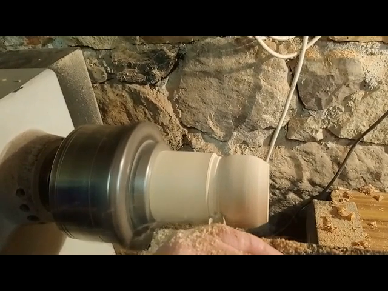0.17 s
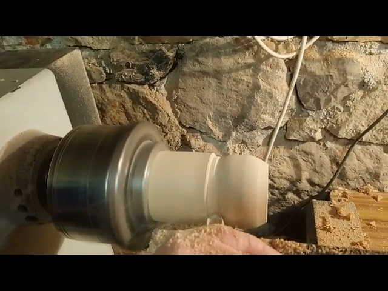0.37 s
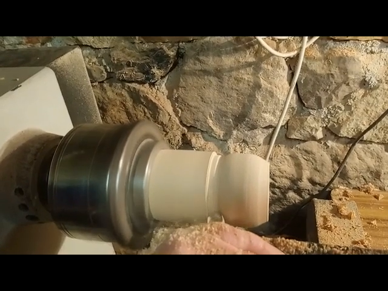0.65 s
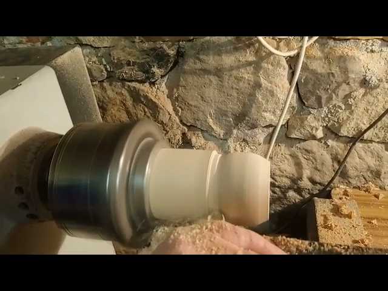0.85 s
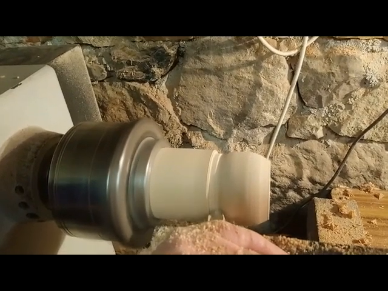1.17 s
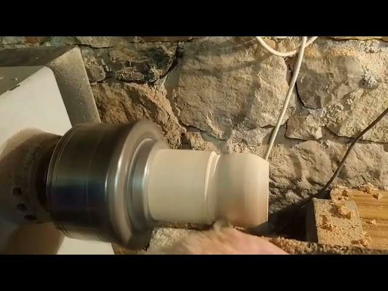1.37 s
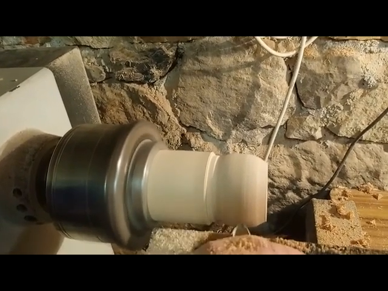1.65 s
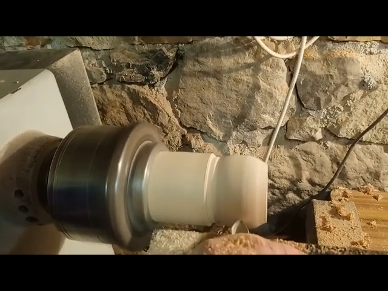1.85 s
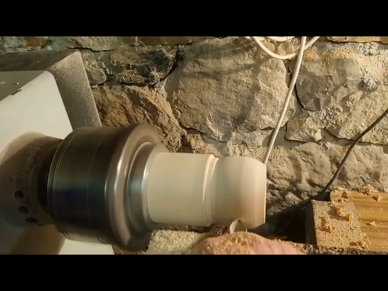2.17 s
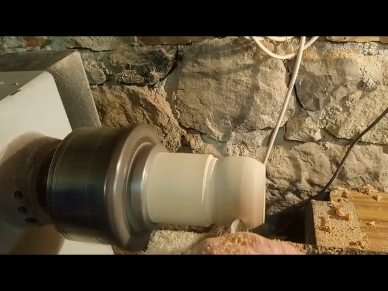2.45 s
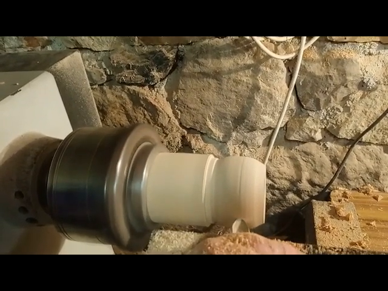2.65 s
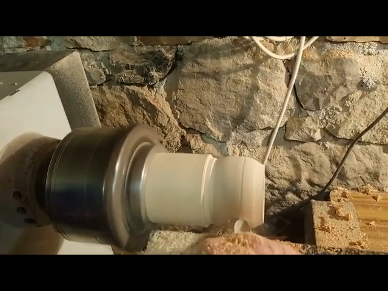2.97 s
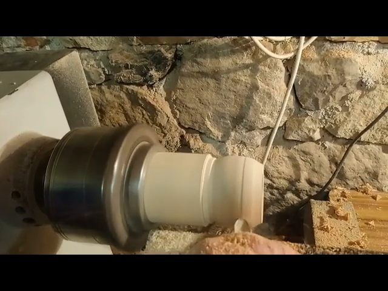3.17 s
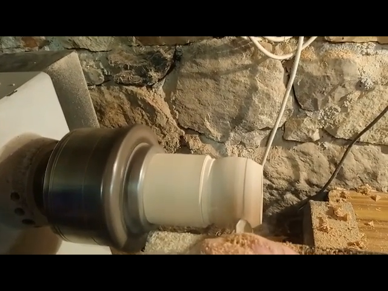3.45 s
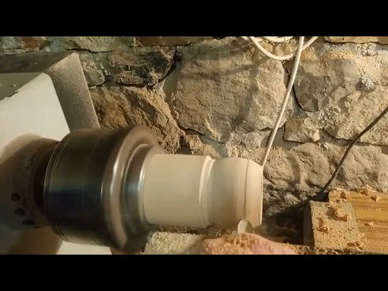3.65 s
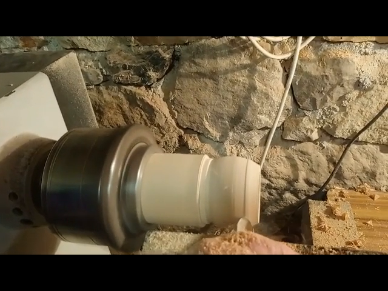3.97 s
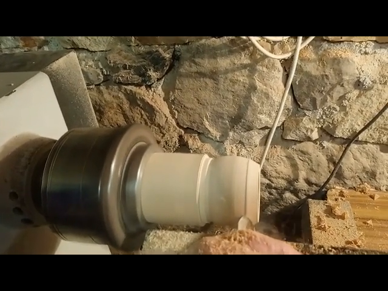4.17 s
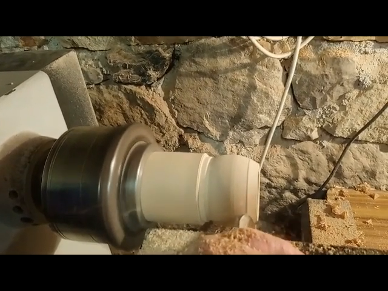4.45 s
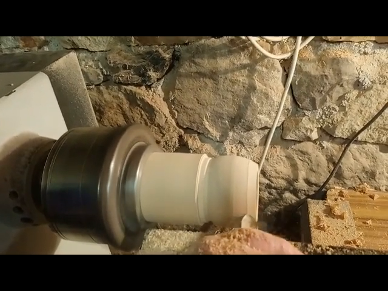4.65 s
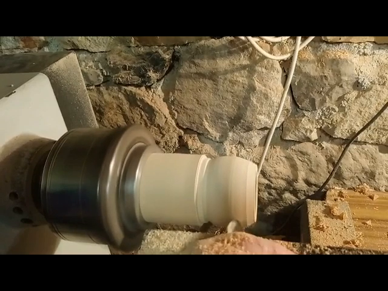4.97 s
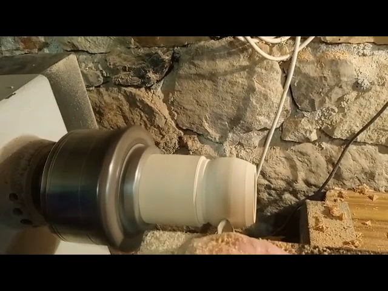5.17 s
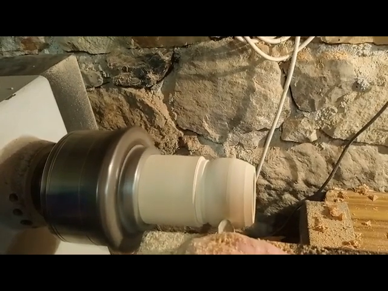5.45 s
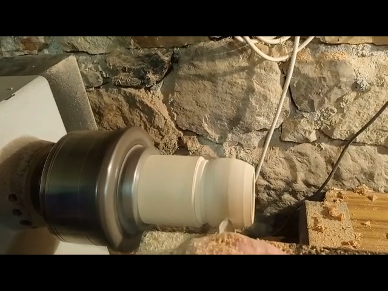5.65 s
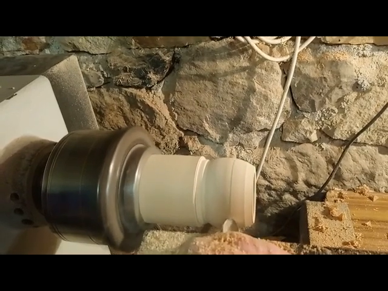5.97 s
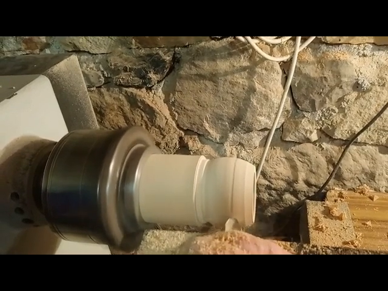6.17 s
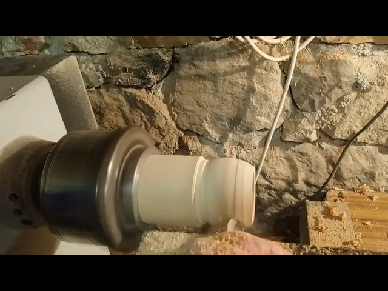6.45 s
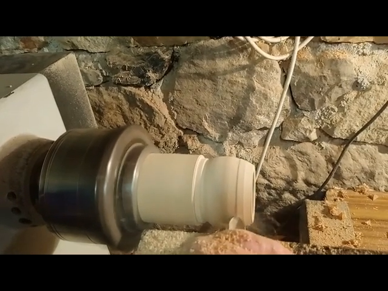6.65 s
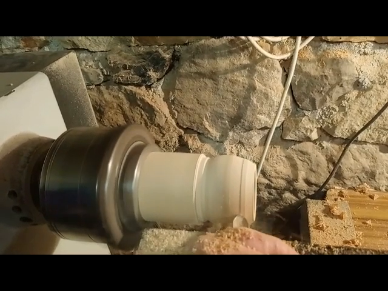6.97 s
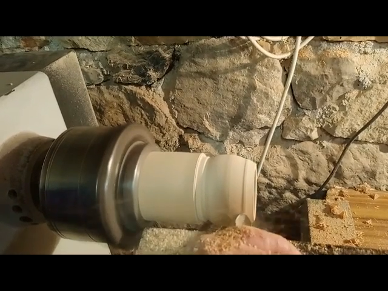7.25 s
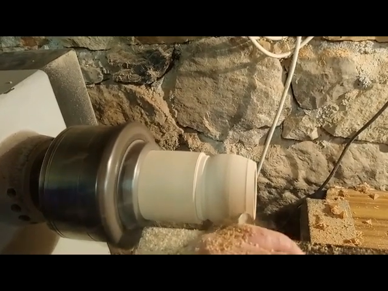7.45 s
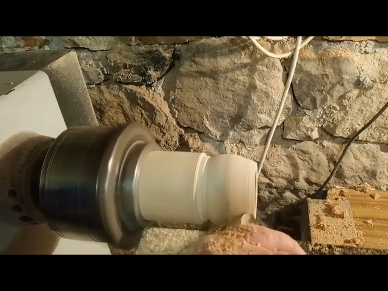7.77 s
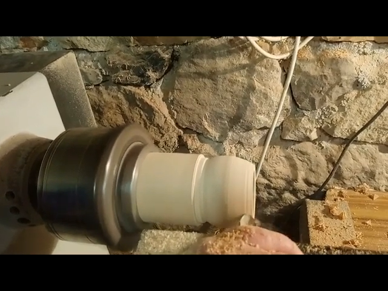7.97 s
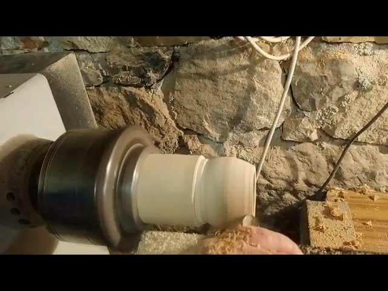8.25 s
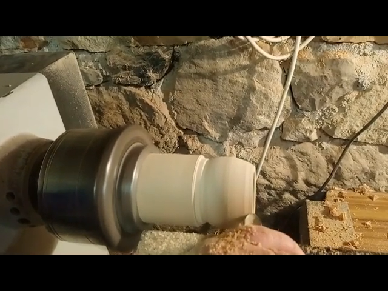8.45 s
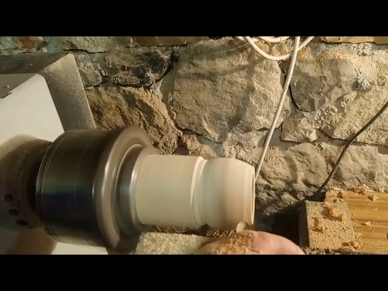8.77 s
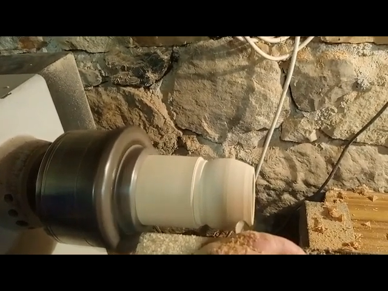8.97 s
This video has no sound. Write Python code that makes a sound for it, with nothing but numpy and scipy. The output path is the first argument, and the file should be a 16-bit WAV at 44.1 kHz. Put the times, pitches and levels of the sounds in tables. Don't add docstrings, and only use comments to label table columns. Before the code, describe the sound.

Motor, belt and bearings hum and rumble throughout, sinking under each cut as the recording level adjusts. A hand-held gouge tears the spinning wood with a gritty, ringing scrape, fluttering rapidly with each turn. It lifts after a second, returns for two passes of several seconds, and touches once more briefly. Short reflections from stone walls, close microphone.

```python
import sys
import numpy as np
from scipy import signal
from scipy.fft import rfft, irfft, next_fast_len
from scipy.io import wavfile
from scipy.ndimage import uniform_filter1d

SR = 44100
rng = np.random.default_rng(int(sys.argv[2]) if len(sys.argv) > 2 else 0)


def amplitude_ratio(level_db):
    exponent = np.asarray(level_db, float) / 20
    return 10 ** exponent


def wav_out(sig):
    wavfile.write(sys.argv[1], SR, np.round(np.clip(np.atleast_2d(sig).T, -1, 1) * 32767).astype(np.int16))


N = 401751
TURN = 2630
ROLL_S = 7.1

# (pitch [Hz], width [Hz], left level [dB], right level [dB])
FLAT_RING = [(260.5, 28, -7.5, -6.5), (457, 110, -15.5, -13), (700, 460, -22, -29),
             (1225, 350, -15.5, -15.5), (1423, 50, 1, -7.5), (1540, 80, -16, -14), (1680, 360, -16, -15),
             (2080, 340, -24, -9.5), (2325, 370, -3, -13), (2580, 380, -5, -30), (2800, 360, -13, -25),
             (3370, 510, -21, -13.5), (3750, 170, -2, -3.5), (3990, 390, -5, -9), (4470, 420, -6, -10),
             (4930, 280, -4.5, -5), (5250, 2900, -60, -18.5), (5270, 660, -8, -60), (6270, 250, -15, -17),
             (7300, 1400, -31, -25.5), (8540, 1700, -34, -32), (9960, 950, -60, -34),
             (11000, 260, -47, -33), (11840, 650, -41, -31), (12760, 940, -36, -32), (14700, 640, -37, -47)]
# (pitch [Hz], width [Hz], left level [dB], right level [dB])
ROLLED_RING = [(267.6, 23.0, -10.0, -10.5), (461.0, 71, -17.0, -14.5), (648, 30, -22.5, -22.0),
               (807, 330, -29.5, -42), (1101, 90, -17.5, -15), (1250, 72, -13.5, -17.5),
               (1410.0, 52, -3, -18), (1523, 330, -16.0, -15.5), (1748, 82, -19, -13),
               (1924, 47, -7, -11.5), (2170, 227, -5, -6.5), (2518, 480, -7.0, -25.0), (3304, 283, -8, -9),
               (3727, 355, -1.0, -3.5), (4116, 250, -3.0, -9), (4695, 590, -4.5, -50),
               (5140, 420, -16.5, -9.0), (5690, 750, -12.5, -10), (6560, 1200, -19.0, -13),
               (7220, 500, -25.5, -8.5), (8280, 290, -32.5, -25), (8920, 390, -30, -30),
               (9830, 860, -60, -29.5), (10700, 2000, -60, -43.0), (12140, 1240, -43, -33.5),
               (12870, 440, -45, -32.5), (13440, 350, -35, -42), (13650, 80, -44, -50),
               (14700, 1500, -36, -36), (3807, 320, 0.76, -1)]
# (pitch [Hz], width [Hz], left level [dB], right level [dB])
SWUNG_RING = [(260.6, 24, -6, -6), (474, 126, -17, -13.5), (652, 110, -19.5, -27), (880, 270, -32, -32),
              (1140, 150, -12.5, -15.5), (1273, 50, -27, -9), (1426, 63, 1, -21), (1500, 210, -12, -11.5),
              (1764, 74, -7, -18), (2015, 360, -6.5, -6), (2220, 170, 0, -7.5), (2447, 290, 0, -31),
              (2740, 320, -54, -12.5), (3180, 480, -6.5, -60), (3787, 340, 1.5, -0.5),
              (3570, 760, -60, -12), (4480, 990, -15.5, -36), (5410, 430, -15.5, -12.5),
              (5900, 820, -19.5, -21), (6760, 850, -29, -19), (7400, 430, -26, -19.5),
              (8070, 250, -35, -24.5), (8700, 730, -34, -30), (9860, 630, -46, -31), (10770, 290, -60, -36),
              (11900, 420, -43, -32.5), (12700, 440, -43, -33), (13300, 510, -38, -36),
              (14270, 280, -46, -45), (14740, 860, -38, -59)]
# (pitch [Hz], width [Hz], left level [dB], right level [dB])
LATHE_RUMBLE = [(93, 29, -15, -11.5), (163, 31, -15.5, -7.5), (266, 64, -3.5, -3.5),
                (351.6, 15, 0.5, -73.5), (425, 140, -21, -10.5), (509, 210, -6, -3), (588, 180, -13, -17),
                (740, 930, -19.5, -23.5), (1090, 540, -20, -14), (1420, 550, -8, -16.5),
                (1580, 87, -9, -10), (2140, 650, -11.5, -19.5), (2880, 1050, -17.5, -26.5),
                (3950, 1600, -21.5, -23.5), (4950, 4100, -51, -25.5), (6070, 1900, -60, -28),
                (7520, 300, -60, -41), (8950, 800, -60, -32)]
# (pitch [Hz], width [Hz], level [dB])
BELT_HUMS = [(88.6, 1, -50), (123.3, 8, -51), (169, 0.5, -52.5), (252.4, 6, -35.5), (327, 2, -63.5),
             (419.4, 10.5, -45.5), (495, 1, -43), (593.4, 2.5, -47), (800, 12, -58.5), (940, 14, -56.5),
             (1081, 10, -53), (1162, 3, -60), (1234, 11.5, -54)]
# (pitch [Hz], left level [dB], right level [dB])
DRIVE_WHINE = [(8516, -95, -80), (8750, -91, -58.5), (8500, -92, -68), (9108, -95, -74), (9400, -88, -71)]
# (pitch [Hz], likeness [0-1])
EAR_LIKENESS = [(60, 0.83), (300, 1), (600, 0.63), (1200, 0.89), (2500, 0.14), (4000, 0.29), (7500, 0.23),
                (9000, .3), (15000, .5)]
# (pitch [Hz], width [Hz], left depth [0-1], right depth [0-1])
PORT_LOSSES = [(7740, 340, 1, 0.58), (11660, 190, .1, 0.17), (14000, 200, .6, .6)]
# (pitch [Hz], level against the loudest band [dB])
FAINTEST = [(2500, -46), (6000, -46), (8000, -40), (10500, -38), (13000, -41), (15500, -38)]
# (edge touches [s], edge lifts [s], high side meets the edge [s],
#          first depth [out-of-rounds], full depth [out-of-rounds])
PASSES = [
    (-1.5, .972, .014, 0.0, 4.0),
    (1.912, 4.415, 2.031, -.2, 3.5),
    (4.936, 8.275, 5.012, -.03, 3.5),
    (9.078, 9.3, 9.1, 1.5, 3.5),
]
# (time [s], gouge ring [dB], lean on the rest [dB], flow of shavings [dB])
HAND_MOVES = [
    [(0, -26, 1, 0), (.27, -26, -.5, 1), (.42, -28, 3.5, 2), (.6, -26.5, 3, -.5), (.84, -27, 3.5, -1),
     (.89, -29, 5, -1.5), (.935, -34.5, 4, -7.5)],
    [(2.25, -23.5, -4, -8), (2.27, -20.5, -4.5, -10.5), (2.43, -20.5, -6, -13), (2.53, -22.5, -2.5, -4),
     (3.27, -22, -5, -5), (3.55, -20, -6.5, -9.5), (3.72, -21.5, -5.5, -5.5), (4.27, -22.5, -4.5, -9),
     (4.39, -31.5, 0, -17.5)],
    [(5.3, -23.5, -4, -7.5), (5.54, -24, -2, -4), (5.82, -22, -5.5, -6), (6.83, -21, -5.5, -7),
     (7.45, -25, 1, -8.5), (7.92, -22, -4, -9.5), (8.06, -26, -1.5, -14), (8.2, -25, -5.5, -13.5),
     (8.23, -29.5, -3, -10)],
]
# (time [s], gouge ring [dB], lean on the rest [dB], flow of shavings [dB])
SKIM_HAND = [
    (9.09, -31.5, -6, -7),
]
DUST_LEVELS = [
    -19.5,
    -16.5,
    -15.5,
    -14,
]
# (place after the high side [turns], extra level [dB])
HARD_SPOTS = [
    (.35, 2.5),
    (.61, 1.8),
]


def evened(x):
    return x / np.sqrt(np.mean(x ** 2) + 1e-20)


def smooth(x, s):
    size = max(int(s * SR), 1)
    return uniform_filter1d(uniform_filter1d(x, size), size)


def returning(memory):
    turns = len(memory) // TURN + 1
    marks = rng.standard_normal((turns, TURN))
    keep = np.clip(np.resize(memory, turns * TURN).reshape(turns, TURN), 0, .97)
    for k in range(1, turns):
        marks[k] = keep[k] * marks[k - 1] + np.sqrt(1 - keep[k] ** 2) * marks[k]
    return marks.ravel()[:len(memory)]


def walls(early_db, tail_db, t60):
    t = np.arange(8192) / SR
    echoes = rng.choice([-1., 1.], (2, 8192)) * (rng.random((2, 8192)) < 2000 / SR) * (t > .001)
    early = echoes * np.exp(-t / 0.0037)
    tail = echoes * amplitude_ratio(-60 * t / t60)
    out = amplitude_ratio(early_db) * early / np.linalg.norm(early[0])
    out += amplitude_ratio(tail_db) * tail / np.linalg.norm(tail[0])
    out = signal.lfilter(*signal.butter(N=2, Wn=700, btype="high", fs=SR), out)
    out[:, 0] += 1
    return out


def radiate(force, other, modes, room, lag, top_hz=17000):
    size = next_fast_len(len(force) + 16384)
    hz = np.fft.rfftfreq(size, 1 / SR)
    power = 0
    for f, width, l_db, r_db in modes:
        power = power + amplitude_ratio([[l_db], [r_db]]) ** 2 / (1 + (2 * (hz - f) / width) ** 2) ** 2
    power = power / (1 + (hz / top_hz) ** 12)
    fold = irfft(np.log(power + 1e-10) / 2, size)
    fold[:, 1:size // 2] *= 2
    fold[:, size // 2 + 1:] = 0
    like_hz, likeness = np.transpose(EAR_LIKENESS)
    same = np.clip(np.interp(np.log(hz + 1), np.log(like_hz), likeness), 0, 1)
    left = rfft(force, size)
    right = same * left * np.exp(2j * np.pi * hz * lag / SR)
    right += np.sqrt(1 - same ** 2) * rfft(other, size)
    heard = np.array([left, right]) * np.exp(rfft(fold)) * rfft(room, size)
    return irfft(heard, size)[:, :len(force)]


def edge_depth(t, touch, lift, first, full):
    sunk = 1 - np.exp(-(t - touch) / .43)
    depth = np.minimum(first + (full - first) * sunk, 1.6 + 6 * (lift - t))
    clear = -1.2
    landed = np.clip(np.minimum((t - touch) / .011, (lift - t) / .021), 0, 1)
    return sunk, clear + (depth - clear) * landed


def tear_fibres(t, touch, lift, high_spot, first, full, lean_db):
    sunk, depth = edge_depth(t, touch, lift, first, full)
    thin = np.exp(-abs(lift - t) / .35)
    memory = .72 + .04 * lean_db + .2 * thin
    turns = (t - high_spot) * SR / TURN
    high_side = np.cos(2 * np.pi * turns)
    bite = np.clip((depth + high_side) / .7, 0, 1) ** .8 * (t < lift)
    bite *= amplitude_ratio(3.2 * high_side / np.maximum(depth, 1) ** 1.2)
    fibres = evened(smooth(returning(memory + 0.11), 0.001))
    fibres += 0.48 * evened(smooth(returning(memory + 0.23), 0.011))
    fibres += 0.29 * evened(smooth(rng.standard_normal(len(t)), 0.0083))
    flicker_db = 1.5 + 1.3 * sunk + 2.2 * thin
    grain_db = sum(db * np.exp(-((turns % 1 - place) / .03) ** 2) for place, db in HARD_SPOTS)
    drive = bite * amplitude_ratio(flicker_db * fibres / 2.26 + sunk * (1 + 2 * thin) * grain_db)
    snaps = amplitude_ratio(1.8 * np.minimum(rng.exponential(1, len(t)), 3))
    low = signal.butter(N=2, Wn=2400, fs=SR)
    high = signal.butter(N=2, Wn=2400, btype="high", fs=SR)
    forces = []
    for ear in "LR":
        coarse = signal.lfilter(*low, returning(memory))
        fine = signal.lfilter(*high, evened(snaps * rng.standard_normal(len(t))))
        forces.append(drive * (coarse + fine))
    return bite, forces


def part_levels(now, touch, lift, high_spot, dust_base_db, hand):
    at, ring, lean, flow = np.transpose(hand)
    entry = np.exp(-(now - touch) / 0.1)
    ring_db = np.interp(now, at, ring) - 2.5 * entry
    ring_db += -330 * np.clip(now - at[-1], 0, .05) * (now > lift - .08)
    lean_db = np.interp(now, at, lean)
    flow_db = np.interp(now, at, flow) - 10 * entry
    flow_db += 4.5 * np.exp(-(now - touch) / 0.32) * np.cos(2 * np.pi * (now - high_spot) * SR / TURN)
    dust_db = dust_base_db + 0.36 * flow_db + 0.48 * lean_db
    wander = evened(uniform_filter1d(rng.standard_normal(len(now)), size=50))
    bench_db = -34.5 + 0.36 * lean_db + wander
    return [bench_db, ring_db + lean_db, ring_db, ring_db + flow_db, ring_db + dust_db]


def cut(touch, lift, high_spot, first, full, dust_base_db, hand, holds, room):
    t = np.arange(round(max(touch, 0) * SR), min(round((lift + 0.097) * SR), N)) / SR
    at, ring, lean, flow = np.transpose(hand)
    bite, forces = tear_fibres(t, touch, lift, high_spot, first, full, np.interp(t, at, lean))
    ringing = [radiate(*forces, hold, room, 8.2) for hold in holds]
    hz, frames, z = signal.stft(ringing, SR, nperseg=512, noverlap=384)
    now = frames + t[0]
    levels = part_levels(now, touch, lift, high_spot, dust_base_db, hand)
    edges = [0, 900, 3100, 4400, 7900, SR]
    for lo, hi, db in zip(edges, edges[1:], levels):
        part = (hz >= lo) & (hz < hi)
        power = np.mean(np.sum(abs(z[:, :, part].mean(1)) ** 2, 1), 1) * 4 / 3 / np.mean(bite ** 2)
        z[:, :, part] *= amplitude_ratio(db) / np.sqrt(power)[:, None, None, None]
    swung = np.clip((now - ROLL_S) / 0.12, 0, 1)
    z = (1 - swung) * z[0] + swung * z[-1]
    clumps = uniform_filter1d(rng.standard_normal(z.shape), size=7, axis=1)
    clumps = evened(uniform_filter1d(clumps, size=18, axis=2))
    z *= amplitude_ratio(clumps * (0.8 + 1.23 * (hz[:, None] / 12000) ** 2))
    grip = uniform_filter1d(rng.standard_normal(z.shape[1:]), size=3, axis=0)
    z *= amplitude_ratio(1.3 * evened(uniform_filter1d(grip, size=70, axis=1)))
    return round(t[0] * SR), signal.istft(z, SR, nperseg=512, noverlap=384)[1][:, :len(t)]


def resonate(x, hz, width):
    spin = np.exp(2j * np.pi * hz * np.arange(len(x)) / SR)
    r = np.exp(-np.pi * max(width, 4) / SR)
    return 2 * (spin * signal.lfilter([1 - r], [1, -r], x / spin)).real


def machine(room):
    t = np.arange(N) / SR
    throb = amplitude_ratio(0.58 * evened(smooth(rng.standard_normal(N), 0.057)))
    shaking = throb * rng.standard_normal((2, N))
    sound = amplitude_ratio(-32.5) * evened(radiate(*shaking, LATHE_RUMBLE, room, 16.5, top_hz=10100))
    for hz, width, db in BELT_HUMS:
        sound += amplitude_ratio(db) * evened(resonate(rng.standard_normal(N), hz, width))
    for hz, l_db, r_db in DRIVE_WHINE:
        sound += amplitude_ratio([[l_db], [r_db]]) * np.sqrt(2) * np.sin(2 * np.pi * (hz * t + rng.random()))
    return sound


def scene():
    room = walls(-10.5, -13, 0.34)
    tool = np.zeros((2, N))
    holds = [[FLAT_RING], [ROLLED_RING], [ROLLED_RING, SWUNG_RING], [ROLLED_RING]]
    for row, dust_db, hand, hold in zip(PASSES, DUST_LEVELS, list(HAND_MOVES) + [SKIM_HAND], holds):
        start, sound = cut(*row, dust_db, hand, hold, room)
        tool[:, start:start + sound.shape[1]] += sound
    loud_db = 10 * np.log10(abs(smooth((tool ** 2).mean(0), 0.0087)) + 1e-9)
    duck_db = smooth(np.maximum(loud_db + 26.5, 0), 0.039)
    return tool + machine(room) * amplitude_ratio(-.8 * duck_db)


def mute_faint(x, waver_db):
    window = np.sqrt(signal.windows.hann(2048, sym=False))
    hz, t, z = signal.stft(x, SR, window=window, nperseg=2048, noverlap=1024)
    bands = z[:, :1024].reshape(2, 128, 8, -1)
    band_db = 10 * np.log10((abs(bands) ** 2).mean(2) + 1e-14)
    under_db = np.interp(hz[4:1024:8], *np.transpose(FAINTEST), left=-99)[:, None]
    waver = evened(uniform_filter1d(rng.standard_normal(band_db.shape[1:]), size=2, axis=1))
    margin_db = band_db - band_db[:, 6:].max((0, 1)) - under_db + waver_db * waver
    z[:, :1024] = (bands * (margin_db > 0)[:, :, None]).reshape(2, 1024, -1)
    return signal.istft(z, SR, window=window, nperseg=2048, noverlap=1024)[1][:, :N]


def low_pass(x):
    return signal.sosfilt(signal.butter(12, 15680, fs=SR, output="sos"), x)


def record(dry):
    hz = np.fft.rfftfreq(N, 1 / SR)
    ports = 1
    for f, width, left, right in PORT_LOSSES:
        ports = ports * (1 - np.clip([[left], [right]], 0, 1) / (1 + (2 * (hz - f) / width) ** 2))
    hiss = amplitude_ratio([[-82], [-66]]) * rng.standard_normal((2, N))
    heard = irfft(rfft(dry + hiss) * ports / np.sqrt(1 + (80 / (hz + 1)) ** 9), N)
    flutter = signal.lfilter(*signal.butter(N=2, Wn=35, fs=SR), rng.standard_normal((3, N)))
    flutter = evened(flutter)
    heard += amplitude_ratio(-63.5) * (flutter[:2] + flutter[2])
    mix = mute_faint(heard, waver_db=5.0)
    return low_pass(mix)


dry = scene()
out = record(dry)
wav_out(out)
```